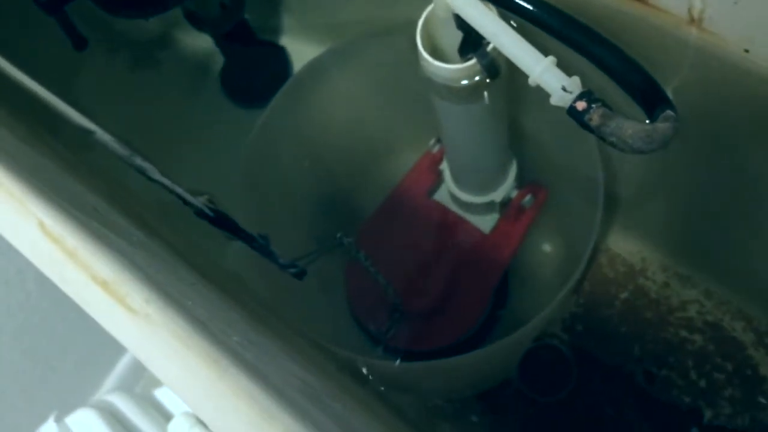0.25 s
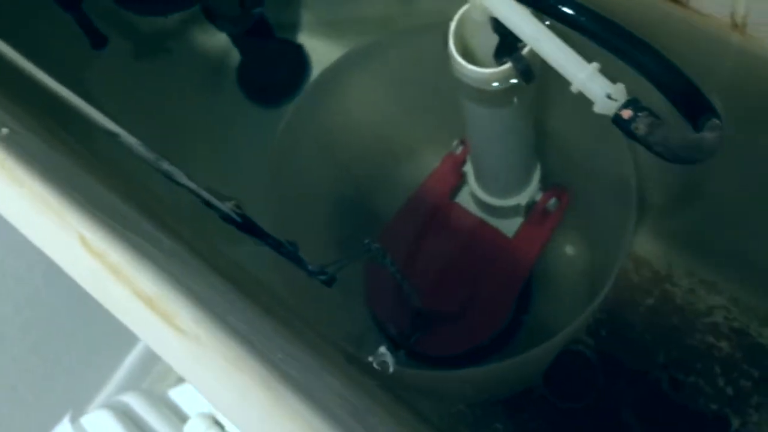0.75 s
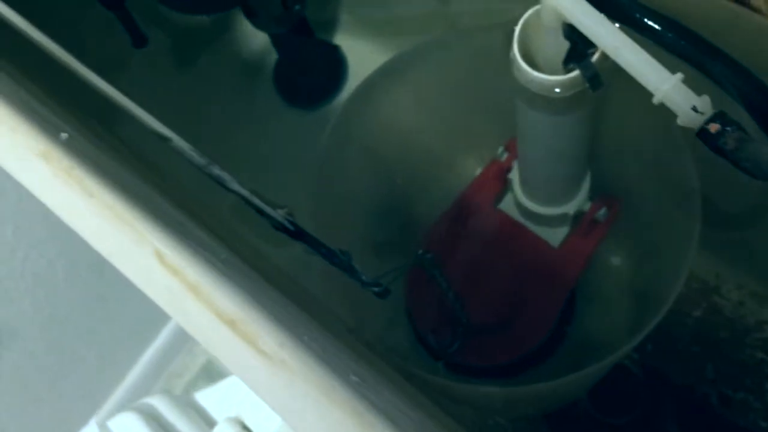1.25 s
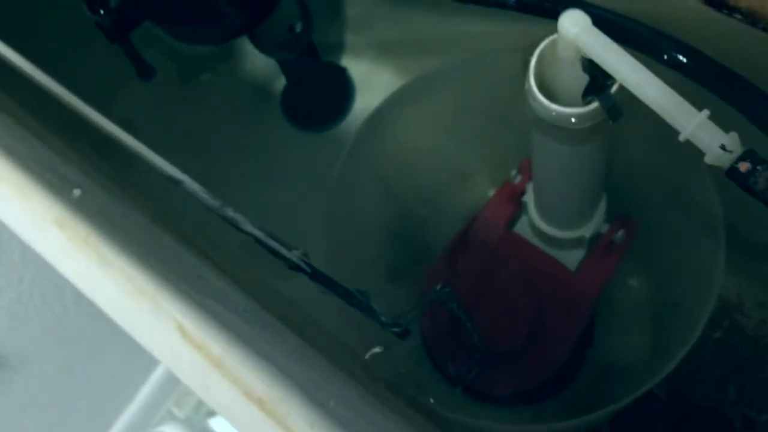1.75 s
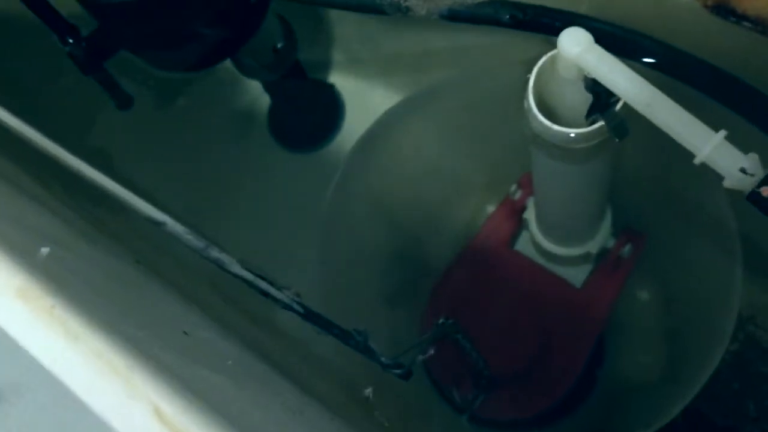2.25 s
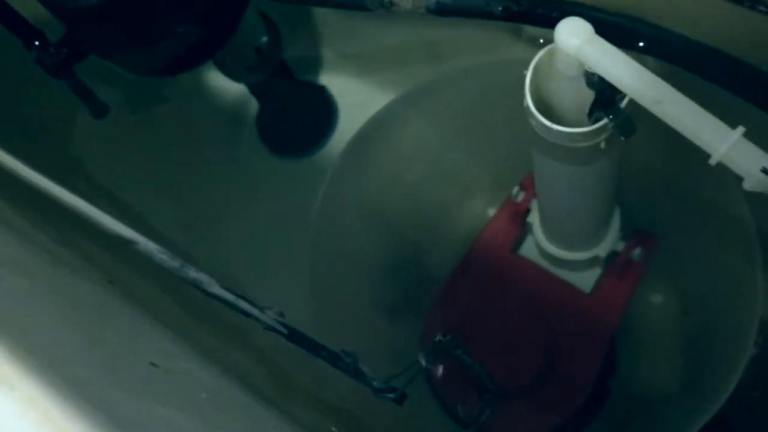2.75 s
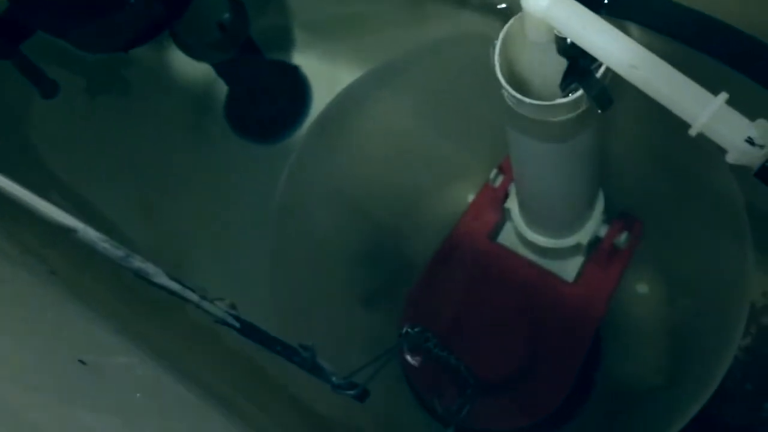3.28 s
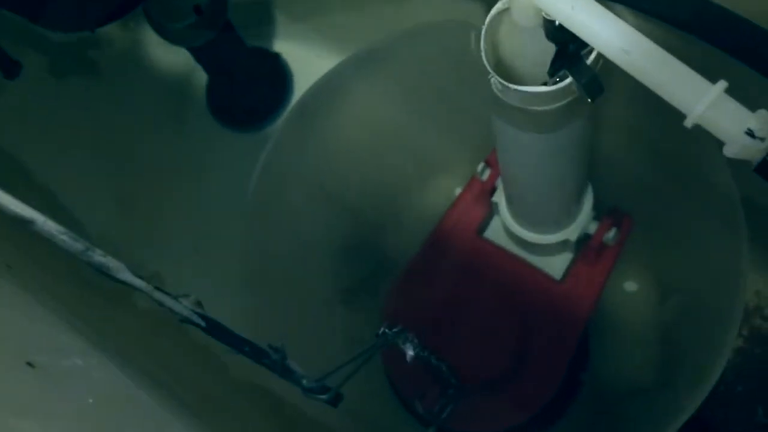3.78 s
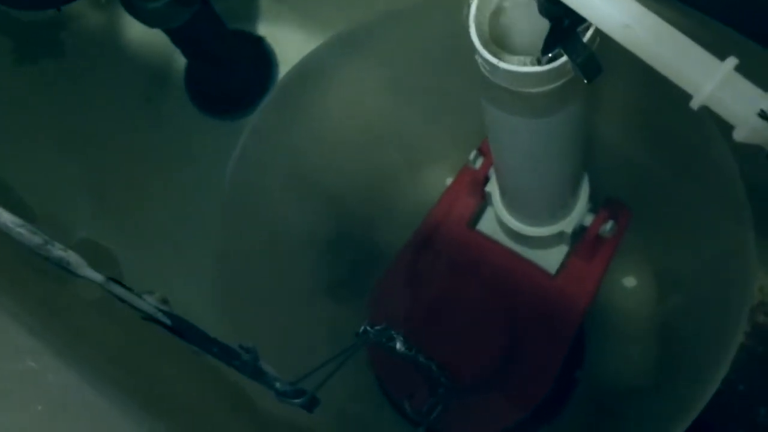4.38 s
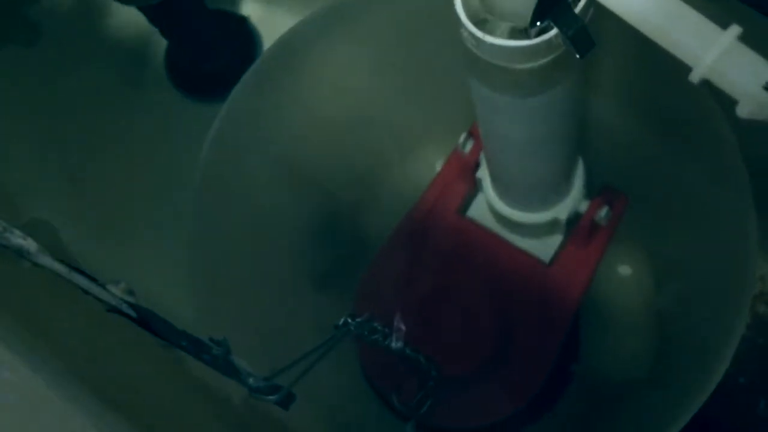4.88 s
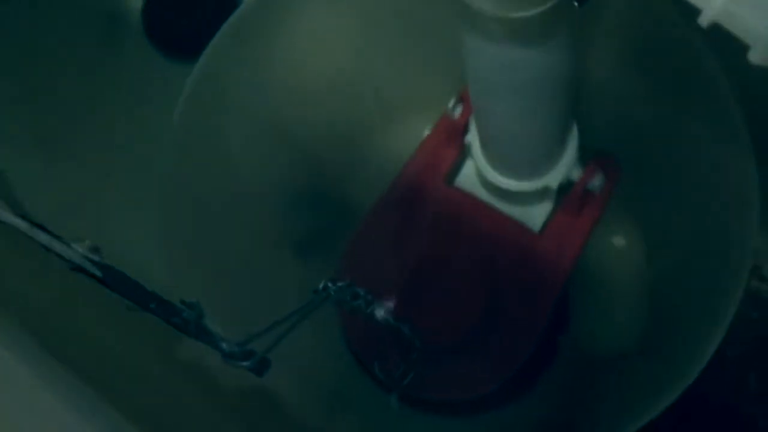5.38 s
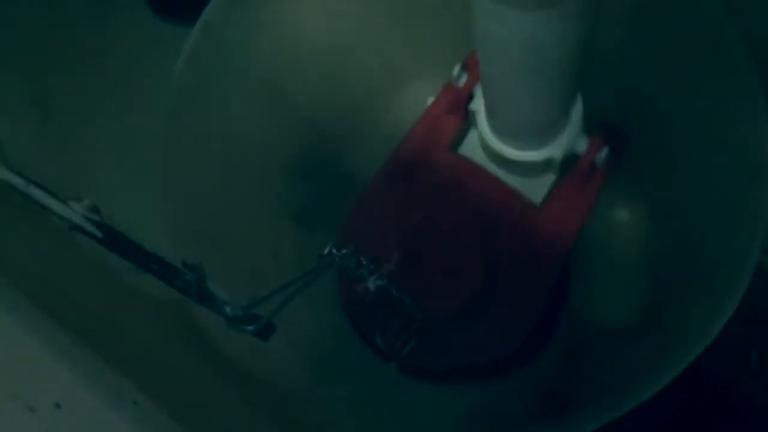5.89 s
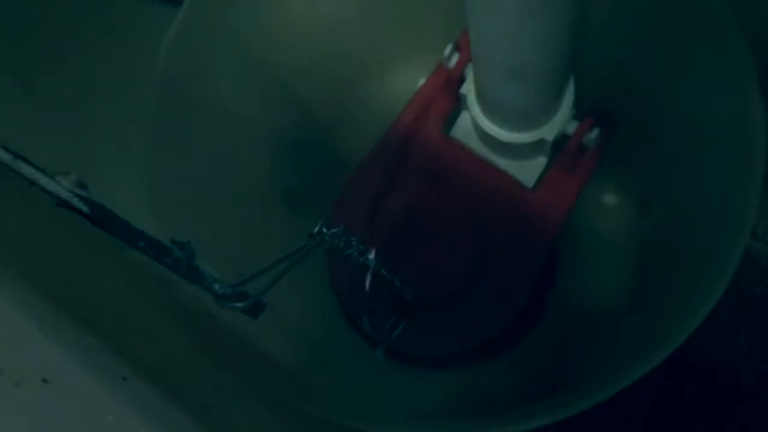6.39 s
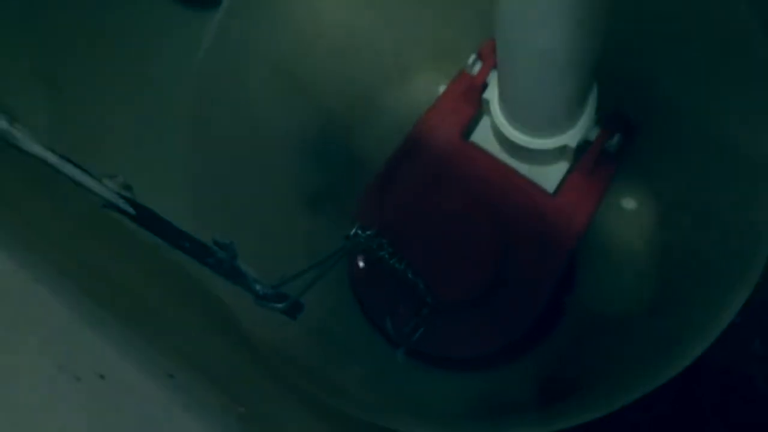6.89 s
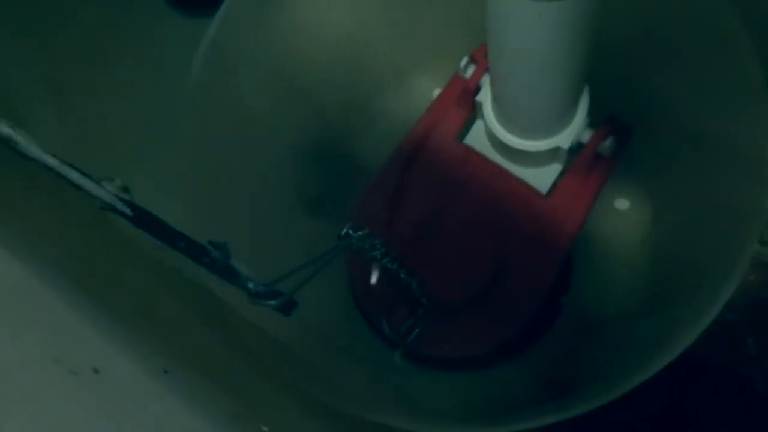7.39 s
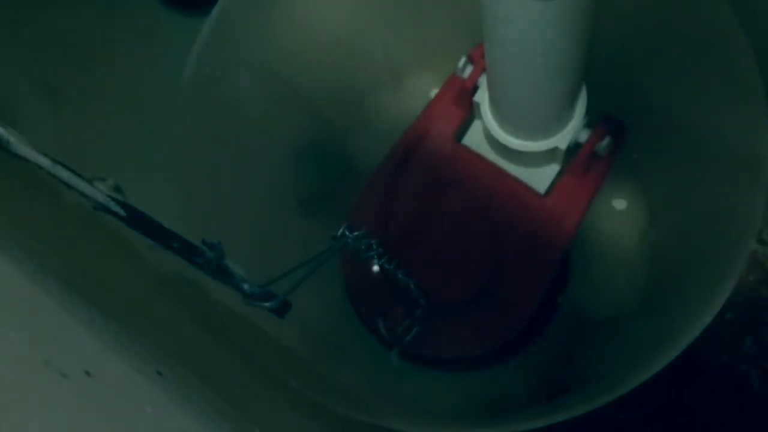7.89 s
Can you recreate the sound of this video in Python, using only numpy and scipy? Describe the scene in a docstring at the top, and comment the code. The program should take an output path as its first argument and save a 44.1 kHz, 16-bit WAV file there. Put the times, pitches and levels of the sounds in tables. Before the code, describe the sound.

An open toilet tank refills with bright hissing, spattering water, gurgles as it nears full, then abruptly shuts off, leaving small trickles and hollow drips.

```python
"""A toilet valve hisses as its open tank refills in a small bathroom, heard from just above the water.
The valve is shaped noise; the jet is random droplets, slaps and sine bubbles; gulps add low bubbles and thuds.
The float shuts the valve, then the refill tube drains in spurts of small bubbles and spray.
Drips and falling water sound the overflow pipe's odd harmonics; dense noise echoes form the porcelain walls."""
import sys
import numpy as np
from scipy import signal
from scipy.fft import rfft, irfft, next_fast_len
from scipy.io import wavfile
from scipy.ndimage import uniform_filter1d

SR = 44100
rng = np.random.default_rng(int(sys.argv[2]) if len(sys.argv) > 2 else 0)


def master_out(mix):
    """Clip the mix to full scale and print it as 16-bit PCM to the path in sys.argv[1]."""
    frames = np.transpose(np.atleast_2d(mix))
    ceiling = np.clip(frames, -1, 1)
    pcm = np.round(ceiling * 32767).astype(np.int16)
    wavfile.write(sys.argv[1], SR, pcm)


N = 358974
TIME = np.arange(N) / SR

# valve closure: the hiss and jet fall 20 dB per SHUT_FADE_S, the pipe's murmur crossfades over it
SHUT_S, SHUT_FADE_S = 6.225, 0.026

# valve hiss, louder as the valve narrows: time_s, level_db
VALVE_CURVE = [(0, -52), (1.25, -52), (1.6, -49), (2.6, -52), (3.6, -49), (4.2, -49.5), (5.15, -50.5),
               (5.45, -50), (5.95, -51), (6.2, -50)]
# spectrum of the hiss: frequency_hz, relative_db
HISS_SPECTRUM = [(40, -61), (75, -34), (115, -16), (300, 2.5), (550, 4.5), (800, -2.5), (1000, -1),
                 (1300, 7.5), (2400, 6.5), (3500, 1.5), (8500, -0.5), (11500, -5), (15000, 3)]
# high resonances of the valve: frequency_hz, width_hz, relative_db
VALVE_MODES = [(9150, 450, -9), (9700, 510, -7.5), (10430, 550, -7), (11750, 670, -1), (12600, 550, 7),
               (13400, 410, 6), (14300, 550, -2), (14900, 550, 5)]
MIST_DB = -5  # against the hiss
# narrow hisses of the valve: centre_s, breadth_s, pitch_hz, width_hz, level_db
SIZZLES = [(0.22, 0.045, 6450, 300, -49), (1.4, 0.5, 13500, 450, -62), (4.0, 0.17, 12700, 600, -59),
           (4.15, 0.39, 11930, 500, -60), (4.8, 0.8, 14800, 500, -66), (5.1, 0.15, 13600, 600, -54),
           (5.9, 0.13, 13500, 600, -55), (6.203, 0.017, 9380, 550, -41.5)]

# jet: harder as the water rises, softer as the float throttles it: time_s, level_db
SPLASH_CURVE = [(0, -45.5), (1.2, -46.5), (2.4, -40.5), (4.1, -40), (5.2, -42.5), (5.4, -44.5),
                (5.9, -45.5), (6.15, -47)]
# spectrum of the jet's droplets: frequency_hz, relative_db
SPATTER_SPECTRUM = [(200, -4), (800, -2), (1200, 6), (2400, -5.5), (3600, 6), (7000, 6.5), (10000, 4),
                    (15500, -17)]
# spectrum of the jet's fine prickle: frequency_hz, relative_db
PRICKLE_SPECTRUM = [(500, -14), (1200, -0.5), (2400, -4.5), (3700, 2.5), (6000, 1.5), (9000, 6), (12000, 2),
                    (15500, -1)]
SPATTER_DB, PRICKLE_DB = -7.5, -5.5  # against the splash curve
# air resonances of the tank: frequency_hz, width_hz, relative_db
TANK_MODES = [(198.7, 30, 14), (395, 14, 4), (596, 113, 10.5), (1390, 42, 0), (1936, 140, 6.5)]
# standing waves in the tank: frequency_hz, width_hz, relative_db
STANDING_WAVES = [(1275, 160, -8), (1946, 76, -9.5), (2610, 89, -11.5), (3235, 110, -7.5), (3377, 86, -8.5),
                  (3773, 58, -1), (4020, 40, -24), (4880, 93, -21), (5550, 120, -21), (6270, 140, -14.5),
                  (7140, 220, -13), (7750, 270, -9)]
# standing waves grow as the microphone dips into the tank: time_s, relative_db
DEPTH_CURVE = [(0, 6), (2.2, 11), (4.2, 5), (5.6, -2), (7.3, 8.5)]

# air column of the overflow pipe: time_s, pitch_hz
PIPE_PITCH = [(0, 190.6), (4.6, 199.4), (6.25, 272), (6.92, 342), (7.65, 423.3), (8.14, 425.8)]
MURMUR_DB, MURMUR_THIRD_DB = -75, -74.5  # valve open: fundamental, third harmonic
DRAIN_DB, DRAIN_THIRD_DB = -71.5, -85.5  # valve shut
DRAIN_FOLLOWS = 0.12  # share of the dribble's swing in dB
# a harmonic is boosted as it meets this tank resonance
MATCH_HZ, MATCH_WIDTH_HZ, MATCH_DB = 1261, 16, 27
# overtones of the overflow pipe: frequency_hz, width_hz, relative_db
PIPE_OVERTONES = [(1191, 214, -1), (1940, 220, 0), (2856, 470, -2.5), (3790, 106, 0.5), (4710, 160, -2.5),
                  (5340, 440, -2.5), (7140, 840, -3.5)]
# overtones sound most while the microphone is over the pipe's mouth: time_s, relative_db
PIPE_RINGING_CURVE = [(0, -34), (3.3, -15), (3.9, 1), (4.25, 4.5), (4.5, 0.5), (4.75, 1), (5.25, 5),
                      (5.45, -5), (6.1, 1.5), (6.25, -47)]
PIPE_STREAM_DB, PIPE_SPLASH_DB = -39.5, 3

# large bubbles: start_s, pitch_hz, level_db, life_s
BUBBLES = [(0.013, 1972, -31, 0.0085), (0.249, 1970, -30.5, 0.0071), (0.449, 1993, -29.5, 0.0076),
           (0.458, 1960, -37, .005), (1.063, 1965, -31, 0.0077), (1.374, 3240, -33, 0.0032),
           (1.374, 4580, -42, 0.0038), (1.445, 570, -43, 0.0054), (1.453, 1970, -36, 0.0061),
           (1.812, 3980, -32, 0.0043), (2.195, 598, -42, 0.012), (2.29, 3940, -28, 0.0035),
           (2.37, 3370, -32.5, 0.0032), (2.399, 3380, -33, 0.0033), (2.582, 1944, -39, .005),
           (2.762, 1990, -38, 0.0074), (2.896, 2780, -40, 0.0039), (2.899, 4460, -35.5, .004),
           (3.085, 5440, -29.5, 0.0046), (3.11, 477, -47.5, 0.0086), (3.476, 1170, -40, 0.0095),
           (3.561, 2950, -26.5, 0.0033), (3.562, 1146, -39.5, 0.0075), (3.917, 2650, -35.5, 0.0061),
           (3.938, 1926, -35.5, 0.0061), (4.206, 530, -39.5, 0.0063), (4.278, 1873, -34.5, 0.0043),
           (4.315, 5290, -28.5, 0.0054), (4.371, 2890, -24.5, 0.0065), (4.421, 1170, -38, .006),
           (4.497, 2090, -29, 0.0052), (4.517, 2880, -30.5, 0.0055), (4.663, 2850, -38, 0.0048),
           (4.684, 2004, -27.5, 0.0054), (4.988, 2010, -26, .0056), (5.008, 1980, -34, 0.0041),
           (5.013, 2880, -36, 0.0054), (5.065, 1985, -29.5, 0.0042), (5.067, 1190, -37, 0.0054),
           (5.129, 2730, -31, 0.0032), (5.198, 2090, -34, 0.0061), (5.224, 1946, -29, 0.0062),
           (5.236, 1340, -40, 0.0051), (5.283, 1927, -32, 0.0076), (5.356, 2870, -36.5, 0.0039),
           (5.532, 1690, -37, 0.0066), (5.583, 1100, -40, 0.009), (5.689, 980, -26.5, 0.0046),
           (5.719, 1070, -39, 0.0069), (5.918, 4650, -33, 0.0044), (6.314, 775, -39.5, 0.0029),
           (6.316, 1580, -36, 0.0058), (6.37, 1210, -49.5, 0.0088), (6.381, 1070, -48.5, 0.0082),
           (6.459, 3220, -53.5, 0.006), (6.471, 1540, -51, 0.0058), (6.511, 1310, -44, 0.0092),
           (6.671, 1710, -41.5, 0.0047), (6.708, 3080, -42, .005), (6.751, 1050, -56, .006),
           (6.791, 1001, -27, 0.0068), (6.803, 3200, -38.5, .004), (6.806, 1650, -42, 0.0038),
           (6.813, 2080, -38, 0.0034), (6.821, 3220, -41, 0.0042), (6.843, 1460, -40.5, 0.0062),
           (6.885, 1740, -42, 0.0045), (6.937, 1540, -46.5, 0.0056), (6.964, 840, -48.5, 0.0079),
           (7.017, 3800, -49, 0.0042), (7.058, 1450, -56, 0.0042), (7.075, 2400, -61, .007),
           (7.135, 3300, -49, .005), (7.14, 1440, -55, 0.0062), (7.178, 3250, -48, 0.0046),
           (7.208, 3200, -42, .005), (7.238, 1660, -47, .006), (7.261, 2260, -44, 0.0054),
           (7.263, 1490, -43.5, 0.0075), (7.285, 2340, -50, 0.013), (7.361, 990, -39.5, 0.0052),
           (7.365, 1820, -46, 0.0065), (7.419, 2150, -51, .007), (7.442, 3910, -40.5, 0.0039),
           (7.465, 1057, -41.5, 0.0064), (7.492, 3880, -61, .004), (7.514, 3880, -49.5, 0.0055),
           (7.562, 1290, -45.5, 0.0053), (7.601, 2570, -53, 0.0046), (7.617, 1750, -48, .006),
           (7.626, 1970, -53, 0.0051), (7.635, 2205, -51, 0.009), (7.638, 3180, -48, .005),
           (7.654, 3200, -57, 0.0039), (7.686, 3080, -49, .006), (7.743, 2320, -60, 0.023),
           (7.808, 980, -56, 0.011), (7.855, 2010, -54, .008), (8.016, 3080, -55, 0.0041),
           (8.024, 1690, -44, 0.0046)]
BUBBLE_RISE_OCTAVES_PER_S = 2.75
RING_HZ, RING_WIDTH_HZ, RING_DB, RING_RETURN_S = 1975, 30, -7, 0.013
# the hardest drops slapping the surface: start_s, pitch_hz, level_db, spray_db (against level_db)
SLAPS = [(0.178, 12800, -37, -3), (0.553, 12800, -33, -7), (0.564, 13500, -35, -10),
         (0.671, 13700, -32, -10), (1.106, 7570, -34, -4), (1.4638, 7300, -24.5, -5.5),
         (1.553, 5660, -32.5, -13), (1.778, 9800, -34, -14), (1.8298, 8100, -32.5, -16),
         (2.148, 4140, -31.5, -3), (2.1765, 8300, -23.5, -11), (2.187, 7500, -31, -1.5),
         (2.238, 11700, -28.5, -14), (2.437, 13500, -36, -4), (2.49, 3850, -28, -12),
         (2.528, 4000, -33.5, -8), (2.6628, 4970, -22.5, 0), (2.972, 7270, -26, -16),
         (3.024, 7100, -32.5, 1.5), (3.2972, 7530, -21.5, -9.5), (3.319, 7600, -40, -5),
         (3.3653, 3750, -22, -20), (3.384, 13700, -31, -12), (3.503, 14900, -32, -7),
         (3.583, 5500, -30, -4), (3.5956, 5660, -29.5, -12), (3.685, 12600, -27, -12),
         (3.7203, 4650, -40, 10.5), (3.8338, 2770, -34, -3), (3.8434, 2640, -34, -6),
         (3.94, 2560, -29.5, -13), (4.0033, 7440, -28, -5), (4.0598, 3000, -34, -9),
         (4.128, 7200, -34, -16), (4.139, 7260, -30.5, -4.5), (4.2143, 7130, -34.5, -19),
         (4.3046, 5370, -32, -18), (4.6104, 2920, -35.5, -23), (4.7054, 6920, -27, -6.5),
         (4.9, 13400, -30, -12), (4.961, 2080, -21, -14), (4.9615, 6600, -34.5, -1),
         (5.096, 13400, -31, -4), (5.14, 7230, -30, -5), (5.189, 5930, -16.5, -17),
         (5.2813, 5780, -22, -16.5), (5.639, 4740, -21.5, -9.5), (5.8734, 5420, -30, -5.5),
         (5.9865, 6130, -26.5, -6.5), (6.315, 1530, -27.5, -34), (6.5113, 6930, -33.5, -12),
         (6.7336, 6960, -39, -3), (6.85, 8450, -29, -15), (6.9716, 6180, -29, -8), (7.012, 7200, -39, -12),
         (7.061, 6450, -45, -7), (7.1716, 8900, -43, -4), (7.238, 8500, -44, -8), (7.4, 6660, -42, -14),
         (7.421, 7600, -44, -15), (7.1082, 6760, -40, -6), (7.19, 5950, -30.5, -17),
         (7.2138, 5820, -25, -14), (7.353, 5660, -35, -8), (7.4327, 5660, -31.5, -9),
         (7.6825, 6120, -26.5, -24), (7.9548, 6140, -46, -1.5), (8.0168, 8240, -39.5, -13),
         (8.0992, 4800, -38.5, -6), (8.1274, 6800, -40, -5)]
LIGHT_SLAPS_PER_S, LIGHT_SLAP_DB, LIGHT_SLAP_SPREAD_DB = 11, 1.5, 4.5  # dB over the splash curve
# levels against the first hit; a bubble's twin shares the rebound delay
REBOUND_S, REBOUND_DB, REBOUND_DECAY_S, TWIN_DB = 0.01, -12.5, 0.001, -11.5
# gouts breaking into clusters of droplets: start_s, decay_s, low_hz, high_hz, level_db
SPLATTERS = [(0.458, 0.011, 3000, 5170, -38), (1.084, 0.027, 3000, 11000, -46.5),
             (1.334, 0.01, 6300, 11400, -40.5), (1.373, 0.0071, 3000, 10700, -34.5),
             (1.465, 0.025, 3900, 10500, -41.5), (1.59, 0.011, 7000, 14500, -39.5),
             (1.684, 0.009, 5470, 10900, -39), (2.373, 0.022, 3070, 4460, -51),
             (2.667, 0.0092, 3880, 5540, -33), (2.895, 0.016, 2370, 4800, -40),
             (3.367, 0.016, 3630, 8600, -34.5), (3.726, 0.0068, 2380, 7900, -30),
             (3.867, 0.0062, 3500, 6300, -38), (4.072, 0.012, 2190, 5200, -39.5),
             (4.315, 0.009, 1070, 6400, -33.5), (4.373, 0.011, 2500, 5960, -39),
             (4.468, 0.06, 1120, 5950, -41.5), (4.706, 0.0088, 1900, 6050, -35),
             (5.22, 0.013, 1100, 6500, -41), (6.658, 0.022, 2020, 7700, -41.5),
             (7.208, 0.017, 4000, 9100, -43), (7.819, 0.0048, 4960, 10800, -48),
             (8.016, 0.011, 1450, 3140, -50)]
SPLATTER_ATTACK_S, SPLATTER_CLUMP_DB = 0.0009, 4.5

# gurgling under the jet: time_s, level_db
GURGLE_CURVE = [(0, -99), (4.25, -71), (4.38, -60), (5.75, -56), (6.1, -62), (6.3, -74.5), (7.0, -72),
                (8.14, -81)]
# spectrum of the churning water: frequency_hz, relative_db
CHURN_SPECTRUM = [(25, -39), (60, -29.5), (110, 0), (170, -13.5), (300, 4), (420, 5.5), (560, -14),
                  (750, -19), (1050, 7), (1600, -18), (4000, -48)]
# gulps of air dragged under by the jet: start_s, pitch_hz, level_db, thump_db (against level_db)
GULPS = [(1.821, 204, -54.5, -1), (4.351, 407, -31.5, -13), (4.421, 467, -32.5, -24), (4.455, 193, -37, 3),
         (4.47, 450, -33, -11), (4.622, 407, -39.5, -27), (4.815, 396, -34, -14), (4.838, 415, -38, -17),
         (4.899, 392, -31.5, -32), (4.937, 382, -34, -24), (5.016, 450, -35, -25), (5.06, 398, -32, -14),
         (5.196, 414, -31.5, -17), (5.218, 400, -32, -16), (5.242, 370, -37, -18), (5.284, 383, -35, -18),
         (5.375, 395, -34.5, -22), (5.392, 285, -34.5, -7), (5.455, 233, -47, 3), (5.562, 416, -36, -28),
         (5.653, 397, -37, -22), (5.721, 298, -33.5, 0.5), (5.904, 284, -36, -13), (6.0, 316, -39.5, -20),
         (6.03, 362, -39, -20), (6.125, 267, -42, -6.5)]
GULP_LIFE_S, GULP_RISE_OCTAVES_PER_LIFE = 0.0087, 0.024
THUMP_DECAY_S, GULP_FROTH_DB, GULP_FROTH_DECAY_S = 0.009, -15, 0.0098  # froth against its gulp
CHURN_DB, BLIPS_DB, FROTH_DB = 3.5, 0.5, 2.5  # against the gurgling curve
FROTH_THINS_S, FROTH_FALL_DB_PER_S = 5.16, 19  # froth thins as the jet weakens

# spurts from the draining tube: start_s, length_s, dribble_db, fine_spray_db
SPURTS = [(6.253, 0.019, -49, -92.5), (6.274, 0.0058, -85.5, -56), (6.461, 0.01, -60, -58),
          (6.5, 0.021, -42.5, -46), (6.612, 0.14, -50, -47.5), (6.769, 0.11, -43, -47),
          (6.924, 0.019, -37.5, -44), (7.098, 0.011, -48.5, -51), (7.174, 0.042, -46, -69),
          (7.248, 0.027, -42.5, -66), (7.342, 0.017, -39.5, -45.5), (7.419, 0.024, -44.5, -60),
          (7.581, 0.039, -38, -51), (7.676, 0.02, -45.5, -65), (7.82, 0.048, -63.5, -58),
          (7.913, 0.011, -76, -56.5), (8.082, 0.068, -76, -58)]
SPURT_ATTACK_S, SPURT_FALL_DB_PER_S = 0.0073, 389
SEEP_DB, SEEP_SPRAY_DB = -72, -75  # constant flow under the spurts
# spectrum of the dribble's droplets: frequency_hz, relative_db
DRIBBLE_SPECTRUM = [(250, -8), (700, -1), (1100, -26), (1600, 31), (2300, 24), (3200, 18), (4200, -11),
                    (6500, 1), (9000, -8), (15000, 9)]
# spectrum of the tube's fine spray: frequency_hz, relative_db
FINE_SPRAY_SPECTRUM = [(2500, -33), (4500, 11), (7000, 9.5), (10000, -4.5), (13000, 8), (15000, -1)]
# resonances rung by the trickle: frequency_hz, width_hz, relative_db
TRICKLE_MODES = [(1570, 150, -15), (2160, 150, 5), (3180, 110, 7)]
# drips ringing the overflow pipe: start_s, fundamental_db, third_harmonic_db, ring_s
PIPE_DRIPS = [(6.262, -51.5, -65, 0.0044), (6.51, -61, -63, 0.0048), (6.716, -65, -77, 0.014),
              (6.88, -49, -70, 0.0055), (6.967, -45, -77, 0.0038), (7.189, -52, -58, 0.013),
              (7.26, -33, -66, 0.01), (7.359, -45, -60, 0.0095), (7.433, -37, -76, 0.017),
              (7.456, -39.5, -74, 0.0071), (7.59, -53, -37.5, 0.021), (7.621, -41.5, -42, 0.024),
              (7.677, -42, -39.5, 0.0094), (7.723, -67, -34, 0.013), (7.743, -65, -41.5, 0.011),
              (7.822, -59.5, -49, 0.015), (7.853, -66, -44.5, 0.02), (7.93, -54.5, -63, 0.012),
              (8.017, -63, -48.5, 0.014), (8.127, -54, -45.5, 0.0072)]

# spectrum of the bathroom's quiet air: frequency_hz, relative_db
AMBIENCE_SPECTRUM = [(30, -22), (70, 0), (120, 16.5), (300, 3.5), (700, -2.5), (2000, -27), (15000, -25)]
CUTOFF_HZ = 15600


def from_db(db):
    """Decibels to gain."""
    return 10 ** (np.asarray(db) / 20)


def rms_one(x):
    """Scale to unit power."""
    return x / np.sqrt(np.mean(x ** 2) + 1e-20)


def in_time(rows):
    """Interpolate each column of a curve at every sample."""
    time_s, *columns = np.transpose(rows)
    return [np.interp(TIME, time_s, column) for column in columns]


def add(out, start_s, sound):
    """Mix a sound in at start_s."""
    at = int(np.clip(start_s * SR, 0, N - 1))
    out[at:at + len(sound)] += sound[:N - at]


def colour(x, spectrum):
    """Filter by a smooth spectrum; rms 1."""
    hz, db = np.transpose(spectrum)
    size = next_fast_len(N + 4096)
    bins_hz = np.maximum(np.fft.rfftfreq(size, 1 / SR), 1)
    gain = from_db(np.interp(np.log(bins_hz), np.log(hz), db))
    return rms_one(irfft(rfft(x, size) * gain, size)[:N])


def drift(rate_hz):
    """Smooth random curve, rms 1: low-passed noise computed at every 40th sample."""
    r = np.exp(-80 * np.pi * rate_hz / SR)
    noise = rng.standard_normal(N // 40 + 2002)
    slow = signal.lfilter([1], [1, -2 * r, r * r], noise)[2000:]  # drop the start-up
    return np.interp(np.arange(N) / 40, np.arange(len(slow)), rms_one(slow))


def resonate(x, hz, width_hz):
    """Two-pole resonance with gain 1 on top."""
    r = np.exp(-np.pi * width_hz / SR)
    poles = [1, -2 * r * np.cos(2 * np.pi * hz / SR), r * r]
    return (1 - r * r) / 2 * signal.lfilter([1, 0, -1], poles, x)


def tank_modes(x):
    """The air in the tank reinforces its own resonances; rms 1."""
    return rms_one(x + sum(from_db(db) * resonate(x, hz, width_hz) for hz, width_hz, db in TANK_MODES))


def impacts(per_s, spread_db):
    """Random clicks of either sign, many small and a few large."""
    sizes = from_db(spread_db * np.minimum(rng.exponential(1, N), 3.5))
    return (rng.random(N) < per_s / SR) * sizes * rng.choice([-1, 1], N)


def spray(per_s, spread_db, burst_s):
    """Each random drop throws up a short decaying burst of noise; rms 1."""
    r = np.exp(-1 / (burst_s * SR))
    power = signal.lfilter([1], [1, -r], impacts(per_s, spread_db) ** 2 + 1e-12)
    return rms_one(np.sqrt(power) * rng.standard_normal(N))


def droplets(per_s, spread_db, burst_s, count=6):
    """Drops of each size splash at their own moments, each size in its own band; rms 1."""
    edges_hz = np.geomspace(800, 16000, count + 1)
    total = np.zeros(N)
    for pair in zip(edges_hz, edges_hz[1:]):
        band = signal.butter(2, pair, "band", fs=SR, output="sos")
        total += signal.sosfilt(band, spray(per_s, spread_db, burst_s))
    return rms_one(total)


def burst(low_hz, high_hz, decay_s, attack_s=0.00041):
    """A band of noise, scaled to rms 1 before a quick rise and an exponential decay."""
    t = TIME[:SR // 8]
    band = signal.butter(2, [low_hz, min(high_hz, .45 * SR)], "band", fs=SR, output="sos")
    noise = rng.standard_normal(len(t))
    envelope = (1 - np.exp(-t / attack_s)) * np.exp(-t / decay_s)
    return signal.sosfilt(band, noise * envelope) / np.std(signal.sosfilt(band, noise))


def bubble(hz, life_s, rise_octaves, swell=0.39, shape=0.68):
    """A trapped bubble swells, rings and dies; pitch rises by rise_octaves per life as it nears the surface."""
    age = np.arange(int(5 * life_s * SR) + 2) / (life_s * SR)  # in lives
    envelope = (age / swell * np.exp(1 - age / swell)) ** shape
    return envelope * np.sin(2 * np.pi * np.cumsum(hz * 2 ** (rise_octaves * age)) / SR)


def bubble_cloud(per_s, low_hz, high_hz, cycles, spread_db, count):
    """Small bubbles of all sizes burst out at random; rms 1."""
    out = np.zeros(N)
    for when, kept, size, strength, damping, rise in rng.random((count, 6)):
        if kept < per_s * N / SR / count:
            hz = low_hz * (high_hz / low_hz) ** size
            life_s = cycles * (.5 + damping) / np.sqrt(hz * high_hz)
            gain = from_db(-spread_db * np.log(strength + .035))  # few strong, many weak
            add(out, when * N / SR, gain * bubble(hz, life_s, 0.019 * rise))
    return rms_one(out)


def mist():
    """Tiny bubbles collapse in the valve and ring each high resonance at their own moments; rms 1."""
    out = 0
    for hz, width_hz, db in VALVE_MODES:
        collapses = spray(per_s=130, spread_db=4.0, burst_s=0.003)
        out = out + from_db(db) * resonate(resonate(collapses, hz, width_hz), hz, width_hz)
    return rms_one(out)


def filling():
    """Valve hiss plus the jet's dense tiny impacts and bubbles; both cut off when the float shuts the valve."""
    splash_db, = in_time(SPLASH_CURVE)
    hiss_db, = in_time(VALVE_CURVE)
    valve = from_db(-20 * np.maximum(TIME - SHUT_S, 0) / SHUT_FADE_S)
    hiss = tank_modes(colour(rng.standard_normal(N), HISS_SPECTRUM))
    drops = droplets(per_s=130, spread_db=4.2, burst_s=0.004, count=18)
    ticks = 0.65 * spray(per_s=450, spread_db=3.0, burst_s=0.0012)
    beads = bubble_cloud(per_s=1100, low_hz=2300, high_hz=11500, cycles=8, spread_db=5.5, count=10000)
    spatter = from_db(SPATTER_DB) * tank_modes(colour(drops, SPATTER_SPECTRUM))
    prickle = from_db(PRICKLE_DB) * tank_modes(colour(ticks + beads, PRICKLE_SPECTRUM))
    valve_noise = from_db(hiss_db) * (hiss + from_db(MIST_DB) * mist())
    jet = from_db(splash_db + 2.14 * drift(5)) * (spatter + prickle)
    return valve * (valve_noise + jet)


def hand_held(x, swell_db=2.5, swell_rate_hz=1.0):
    """The microphone wanders: near walls comb the treble and standing waves swell and fade."""
    out, samples = x.copy(), np.arange(N)
    treble = signal.sosfilt(signal.butter(2, 4000, "high", fs=SR, output="sos"), x)
    for trip_s in np.geomspace(.0011, .0047, 4):
        lag = (trip_s + .00004 * drift(0.12)) * SR
        out += 0.22 * np.interp(samples - lag, samples, treble)
    waves = 0
    for hz, width_hz, db in STANDING_WAVES:
        waves = waves + from_db(db + swell_db * drift(swell_rate_hz)) * resonate(x, hz, width_hz)
    depth_db, = in_time(DEPTH_CURVE)
    return from_db(-6.0) * (out + from_db(depth_db) * waves)


def overflow_pipe(flow, sway_hz=10, flutter_hz=45, flutter=0.43):
    """Falling water keeps the air column murmuring on odd harmonics, rising as the column shortens."""
    hz, = in_time(PIPE_PITCH)
    phase = 2 * np.pi * np.cumsum(hz * (1 + 0.01444 * drift(10.7))) / SR
    shut = np.clip((TIME - SHUT_S) / SHUT_FADE_S, 0, 1)
    surge = (flow / from_db(SEEP_DB)) ** DRAIN_FOLLOWS
    out = 0
    for harmonic, open_db, shut_db in ((1, MURMUR_DB, DRAIN_DB), (3, MURMUR_THIRD_DB, DRAIN_THIRD_DB)):
        match_db = MATCH_DB * np.exp(-((harmonic * hz - MATCH_HZ) / MATCH_WIDTH_HZ) ** 2)
        uneven_db = 4.5 * drift(9)
        feed = (1 - shut) * from_db(open_db) + shut * surge * from_db(shut_db)
        feed = feed * from_db(match_db + uneven_db)
        for wave in (np.sin, np.cos):  # independent sway in each blurs the tone
            sway = drift(sway_hz * harmonic) + flutter * drift(flutter_hz)
            out = out + feed * sway * wave(harmonic * phase)
    return out


def pipe_ringing(splashes):
    """The refill tube's stream and nearby splashes ring the overtones of the overflow pipe."""
    level_db, = in_time(PIPE_RINGING_CURVE)
    stream = from_db(PIPE_STREAM_DB) * spray(per_s=110, spread_db=5.0, burst_s=0.0034)
    feed = from_db(level_db) * (stream + from_db(PIPE_SPLASH_DB) * splashes)
    out = 0
    for hz, width_hz, db in PIPE_OVERTONES:
        ring = resonate(resonate(feed, hz, width_hz), hz, width_hz)
        out = out + from_db(db + 2.0 * drift(7.3)) * ring
    return out


def plops(froth_db=-27):
    """Each large bubble tears off a brief froth and a smaller twin; the tank's air rings on after it."""
    out = np.zeros(N)
    chances = rng.standard_normal((len(BUBBLES), 2))
    for (start_s, hz, db, life_s), (late, detune) in zip(BUBBLES, chances):
        rise = BUBBLE_RISE_OCTAVES_PER_S * life_s
        add(out, start_s, from_db(db) * bubble(hz, life_s, rise))
        froth = burst(max(0.5 * hz, 1100), 2 * hz + 2500, life_s)
        add(out, start_s, from_db(db + froth_db) * froth)
        twin = bubble(hz * (1.003 + 0.041 * detune), 0.48 * life_s, rise)
        add(out, start_s + REBOUND_S + 0.000986 * late, from_db(db + TWIN_DB) * twin)
    add(out, RING_RETURN_S, from_db(RING_DB) * resonate(out, RING_HZ, RING_WIDTH_HZ))
    return out


def light_slaps(low_hz=2900, high_hz=9500, spray_db=-4, count=200):
    """Rows like SLAPS for drops thrown at random by the jet, as strong as its splashing."""
    when, kept, size = rng.random((count, 3)).T
    start_s = when * SHUT_S
    splash_db = np.interp(start_s, *np.transpose(SPLASH_CURVE))
    db = splash_db + LIGHT_SLAP_DB + LIGHT_SLAP_SPREAD_DB * rng.standard_normal(count)
    hz = low_hz * (high_hz / low_hz) ** size
    rows = np.column_stack([start_s, hz, db, np.full(count, spray_db)])
    return rows[kept < LIGHT_SLAPS_PER_S * SHUT_S / count]


def slaps(life_s=0.002, splash_s=0.0038):
    """A drop gives one very short bubble and a dying spray around its pitch; a weaker rebound follows."""
    out = np.zeros(N)
    for start_s, hz, db, spray_db in [*SLAPS, *light_slaps()]:
        add(out, start_s, from_db(db - 2.5) * bubble(hz, life_s, 0.04))
        add(out, start_s, from_db(db + spray_db) * burst(hz * 0.69, hz * 1.475, splash_s))
        rebound = burst(hz * 0.92, hz * 1.18, REBOUND_DECAY_S)
        add(out, start_s + REBOUND_S, from_db(db + REBOUND_DB) * rebound)
    return out


def valve_singing():
    """Water squeezing through the closing valve hisses at shifting high pitches and ends with a short spit."""
    out = np.zeros(N)
    for centre_s, breadth_s, hz, width_hz, db in SIZZLES:
        swell = np.exp(-((TIME - centre_s) / breadth_s) ** 2)
        flicker = from_db(3.5 * drift(9) - 1)
        narrow = resonate(resonate(rng.standard_normal(N), hz, width_hz), hz, width_hz)
        out += from_db(db) * swell * flicker * rms_one(narrow)
    return out


def splatters(count=5):
    """A gout of water breaks into a quick cluster of droplets of several sizes that thins out."""
    out, t = np.zeros(N), TIME[:SR // 4]
    for start_s, decay_s, low_hz, high_hz, db in SPLATTERS:
        edges_hz = np.geomspace(low_hz, min(high_hz, .45 * SR), count + 1)
        patter = 0
        for pair in zip(edges_hz, edges_hz[1:]):
            clumps = rms_one(uniform_filter1d(rng.standard_normal(len(t)), size=130))
            grains = rng.standard_normal(len(t)) * from_db(SPLATTER_CLUMP_DB * clumps)
            band = signal.butter(2, pair, "band", fs=SR, output="sos")
            patter = patter + signal.sosfilt(band, grains)
        envelope = (1 - np.exp(-t / SPLATTER_ATTACK_S)) * np.exp(-t / decay_s)
        add(out, start_s, from_db(db) * rms_one(patter) * envelope)
    return out


def gurgling():
    """Churning water thumps the low resonances and blips; each gulp of air adds a bloop, a thud and froth."""
    gurgle_db, = in_time(GURGLE_CURVE)
    churn = spray(per_s=220, spread_db=2.5, burst_s=0.008)
    blips = bubble_cloud(per_s=110, low_hz=350, high_hz=520, cycles=3.2, spread_db=2.5, count=1200)
    froth = bubble_cloud(per_s=420, low_hz=1000, high_hz=3400, cycles=7, spread_db=4.0, count=4000)
    thinning_db = np.maximum(TIME - FROTH_THINS_S, 0) * FROTH_FALL_DB_PER_S
    out = from_db(gurgle_db + CHURN_DB) * tank_modes(colour(churn, CHURN_SPECTRUM))
    out += from_db(gurgle_db + BLIPS_DB) * blips * (TIME < SHUT_S)
    out += from_db(gurgle_db + FROTH_DB - thinning_db) * froth
    for start_s, hz, db, thump_db in GULPS:
        thump = burst(low_hz=91, high_hz=285, decay_s=THUMP_DECAY_S)
        breakup = burst(low_hz=1050, high_hz=3000, decay_s=GULP_FROTH_DECAY_S)
        add(out, start_s, from_db(db) * bubble(hz, GULP_LIFE_S, GULP_RISE_OCTAVES_PER_LIFE))
        add(out, start_s, from_db(db + thump_db) * thump)
        add(out, start_s, from_db(db + GULP_FROTH_DB) * breakup)
    return out


def spurt(start_s, length_s):
    """Envelope of a spurt: swells, holds and falls away."""
    attack = np.clip((TIME - start_s) / SPURT_ATTACK_S, 0, 1)
    return attack * from_db(-SPURT_FALL_DB_PER_S * np.clip(TIME - start_s - length_s, 0, 1))


def tube_flow():
    """Strength of the dribble and of the fine spray: a faint seep plus the spurts."""
    dribble, fine = from_db(SEEP_DB), from_db(SEEP_SPRAY_DB)
    for start_s, length_s, dribble_db, spray_db in SPURTS:
        envelope = spurt(start_s, length_s)
        dribble = dribble + from_db(dribble_db) * envelope
        fine = fine + from_db(spray_db) * envelope
    return dribble, fine


def trickling(flow, spray_flow):
    """The tube's last water runs in spurts: many small overlapping bubbles, some droplets and fine spray."""
    drops = droplets(per_s=220, spread_db=4.0, burst_s=0.0035, count=16)
    specks = droplets(per_s=90, spread_db=5.5, burst_s=0.002, count=20)
    beads = bubble_cloud(per_s=900, low_hz=1100, high_hz=4600, cycles=14, spread_db=4.6, count=9000)
    dribble = beads + 0.35 * colour(drops, DRIBBLE_SPECTRUM)
    ringing = dribble.copy()
    for hz, width_hz, db in TRICKLE_MODES:
        ringing += from_db(db) * resonate(dribble, hz, width_hz)
    trickle = flow * from_db(-9.5) * rms_one(ringing)
    return (TIME > SHUT_S) * (trickle + spray_flow * colour(specks, FINE_SPRAY_SPECTRUM))


def pipe_drips(waver=0.011, waver_hz=28, flutter_db=2.5):
    """Drips ring the air column at its current pitch and three times that; sloshing makes the notes waver."""
    out = np.zeros(N)
    for start_s, first_db, third_db, ring_s in PIPE_DRIPS:
        hz = np.interp(start_s, *np.transpose(PIPE_PITCH))
        add(out, start_s, from_db(first_db) * bubble(hz, ring_s, 0, swell=0.65, shape=0.53))
        add(out, start_s, from_db(third_db) * bubble(3 * hz, ring_s, 0))
    lag = waver / (2 * np.pi * waver_hz) * SR * drift(waver_hz)
    wavering = np.interp(np.arange(N) - lag, np.arange(N), out)
    return from_db(flutter_db * drift(waver_hz)) * wavering


def echoes(x, first_s, t60_s, wall_hz, count=12):
    """Dense reflections from hard walls; their pattern keeps changing as the water and microphone move."""
    t, out = TIME[:SR // 4], np.zeros(N)
    dull = signal.butter(1, min(wall_hz, .45 * SR), fs=SR, output="sos")
    step = N // count + 1
    for k in range(count + 1):  # crossfade between independent noise tails
        at = np.arange(max(k - 1, 0) * step, min((k + 1) * step, N))
        tail = rng.standard_normal(len(t)) * (t > first_s) * from_db(-60 * t / t60_s)
        response = signal.sosfilt(dull, tail / np.linalg.norm(tail))
        piece = x[at] * np.cos(np.pi / 2 * (at / step - k))
        add(out, at[0] / SR, signal.fftconvolve(piece, response))
    return out


def scene():
    """Water sounds with the short ring of the tank, the bathroom's tail and its quiet air."""
    air = from_db(-76.5) * colour(rng.standard_normal(N), AMBIENCE_SPECTRUM)
    flow, spray_flow = tube_flow()
    running = hand_held(filling() + trickling(flow, spray_flow)) + valve_singing() + gurgling()
    splashes = slaps() + splatters()
    pipe = overflow_pipe(flow) + pipe_drips() + pipe_ringing(splashes)
    water = running + pipe + plops() + splashes
    tank = from_db(-10.0) * echoes(water, first_s=0.00499, t60_s=0.11, wall_hz=7950)
    bathroom = from_db(-20) * echoes(water, first_s=0.03, t60_s=0.11, wall_hz=4940)
    return (water + tank + bathroom + air)[None]


def record(dry):
    """The microphone loses the deep bass and the top is cut."""
    thin = signal.sosfilt(signal.butter(2, 60, "high", fs=SR, output="sos"), dry)
    return signal.sosfilt(signal.ellip(10, .1, 80, CUTOFF_HZ, fs=SR, output="sos"), thin)


dry = scene()
out = record(dry)
master_out(out)
```